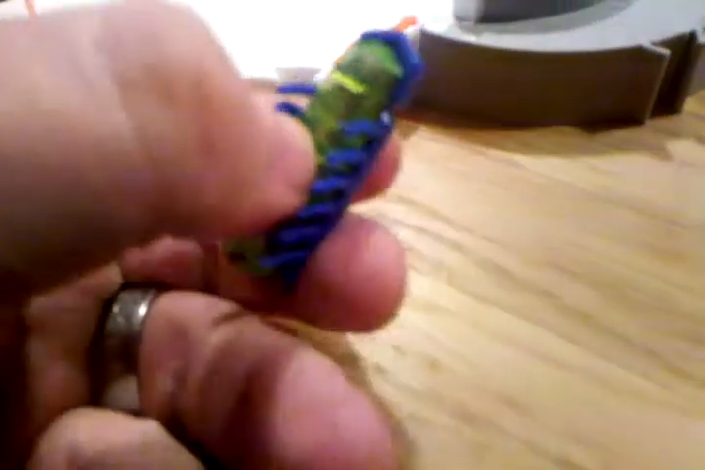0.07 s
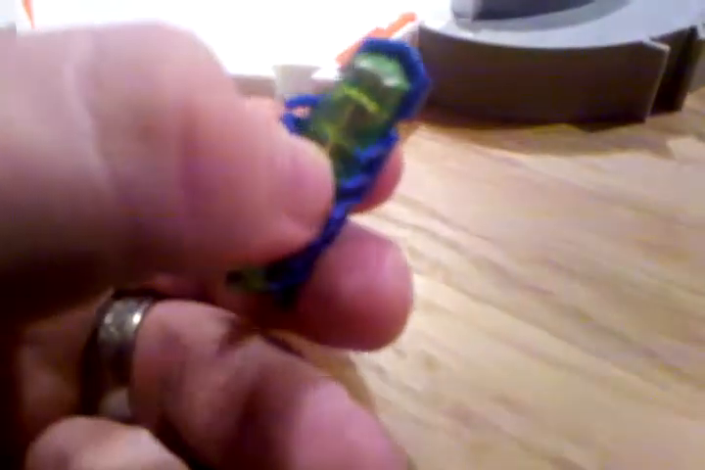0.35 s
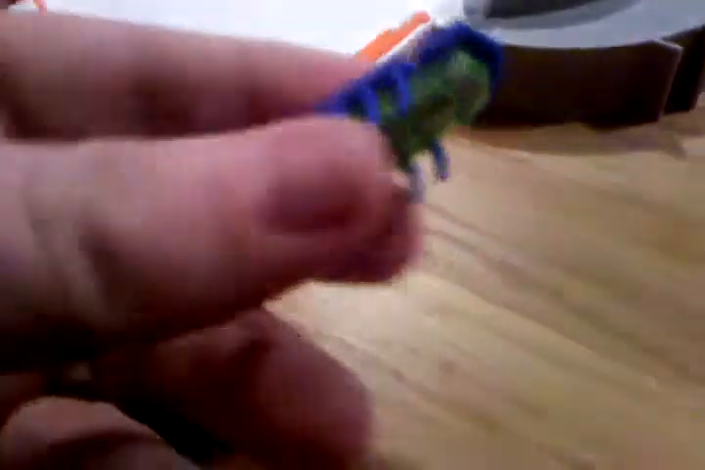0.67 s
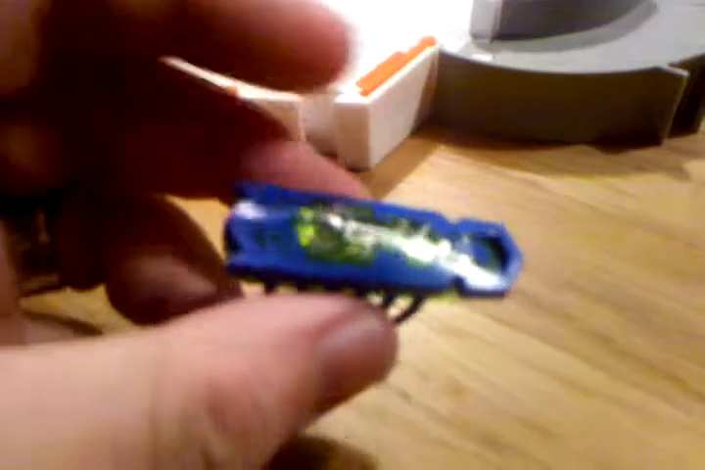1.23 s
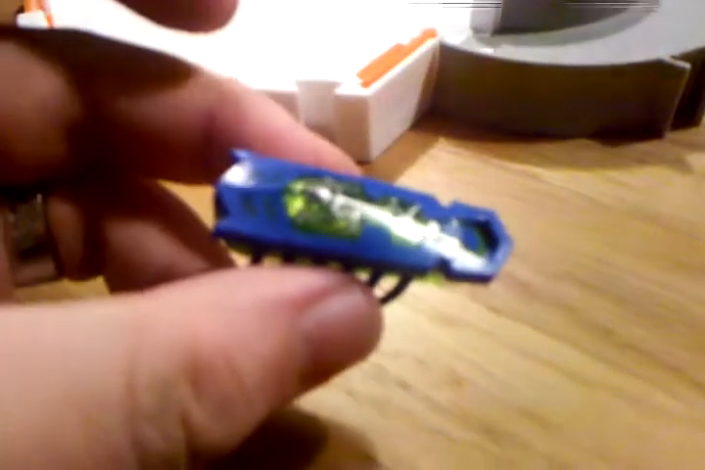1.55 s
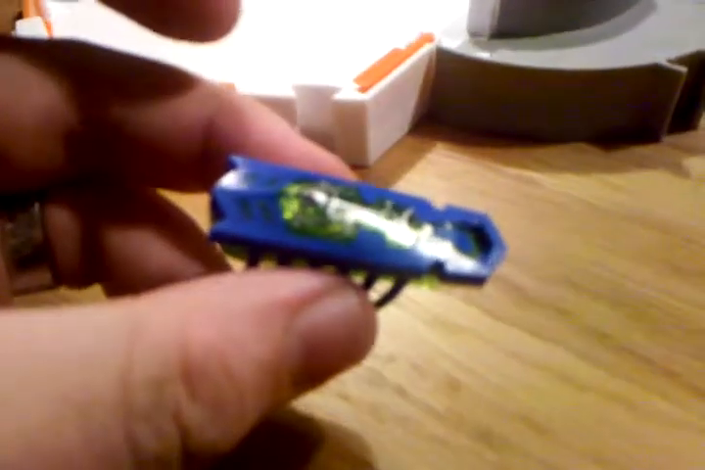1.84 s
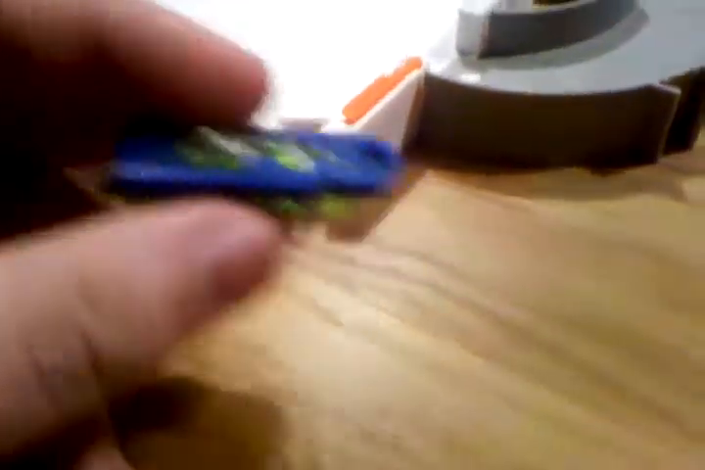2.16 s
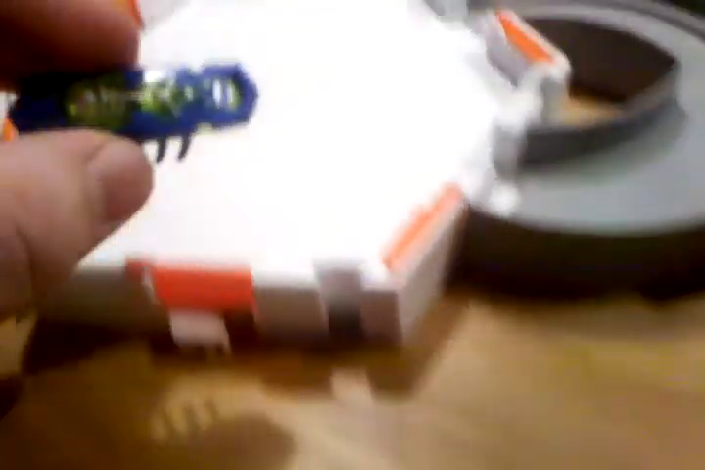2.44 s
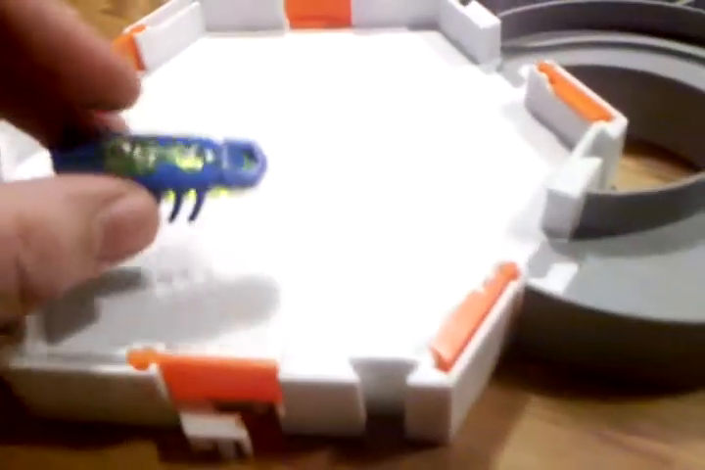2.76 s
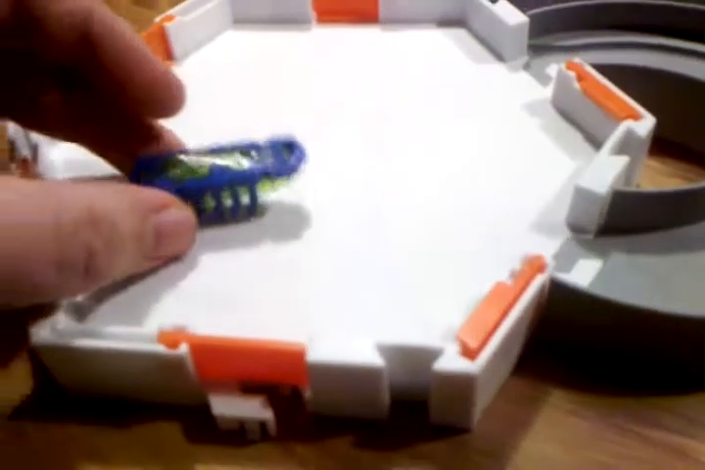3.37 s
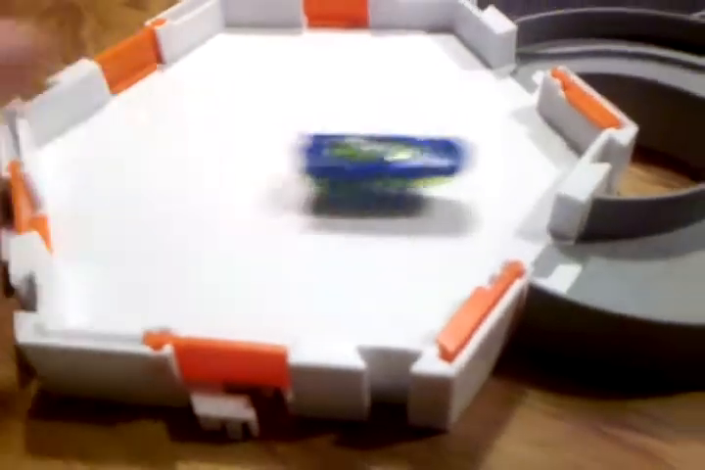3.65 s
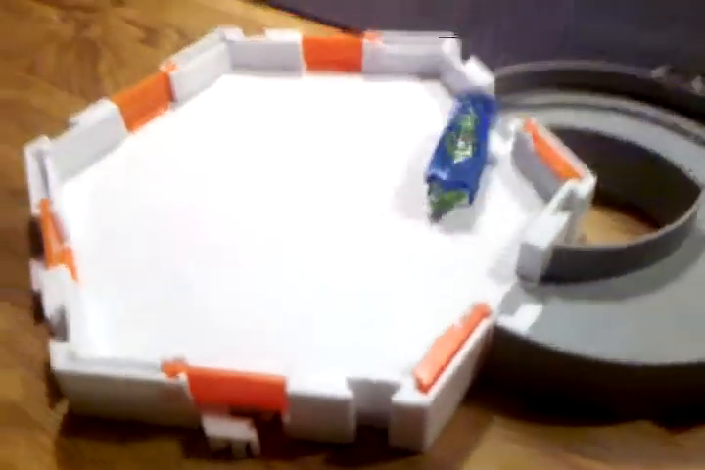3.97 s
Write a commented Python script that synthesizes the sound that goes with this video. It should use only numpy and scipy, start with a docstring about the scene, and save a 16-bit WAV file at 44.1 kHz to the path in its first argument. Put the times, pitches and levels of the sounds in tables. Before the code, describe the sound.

A small vibrating toy bug clicks on, ticks briefly and speeds up into a soft hum with a thin whine. It then buzzes against a plastic tray, rattles across it and knocks a wall, close by in a quiet room.

```python
"""A click, a ticking that speeds up into a hum, then a buzz and a rattle: a small plastic toy bug,
close by in a quiet room. Its motor spins an off-centre weight, which ticks on the shell once a turn
and then hums, while the motor's contacts add a thin whine. Held against a hard plastic tray, the
legs buzz; let go, the toy hops, drums the tray, rattles its own shell and knocks into a wall."""
import sys
import numpy as np
from scipy import signal
from scipy.fft import rfft, irfft
from scipy.io import wavfile
from scipy.ndimage import uniform_filter1d

SR = 44100
rng = np.random.default_rng(int(sys.argv[2]) if len(sys.argv) > 2 else 0)


def store_wav(level_fs):
    """Save 16-bit WAV to argv[1]."""
    pcm = np.round(np.clip(np.atleast_2d(level_fs), -1, 1) * 32767)
    wavfile.write(sys.argv[1], SR, pcm.T.astype(np.int16))


N = 176400
SWITCH_S, PRESS_S, RELEASE_S = .2813, 3.12, 3.385  # switched on, held on the tray, let go
SHELL_CUT_HZ = 1130  # the small shell gives off little sound below this

# tone colour of light rubbing: f/Hz, level/dB
RUBBING_COLOUR = [(1000, -13.5), (2600, -7), (3400, 2), (5200, 0), (7000, 3.5)]
# notes at which the tray rings: f/Hz, width/Hz, level/dB
TRAY_MODES = [(221, 32.5, 1), (306, 210, -8.5), (562, 76, -2), (624, 78, -4.5), (728, 100, -9),
              (939.4, 44.5, 1), (1082, 72, -2), (1240, 280, -6)]


def undb(db):
    """Turn decibels into a gain."""
    return 10 ** (np.asarray(db) / 20)


def unit(x):
    """Scale a signal to an average (rms) size of 1."""
    return x / np.sqrt(np.mean(x ** 2))


def curve(table, column=1):
    """Join one column of a table by straight lines in time."""
    rows = np.array(table, float)
    return np.interp(np.arange(N) / SR, rows[:, 0], rows[:, column])


def gate(start, end, fade):
    """Fade in from start and out from end; all in seconds."""
    t = np.arange(N) / SR
    return np.clip((t - start) / fade, 0, 1) * np.clip((end - t) / fade + 1, 0, 1)


def gain_at(points, hz):
    """Read the gain at hz from a table of f/Hz, level/dB."""
    rows = np.array(points, float)
    return undb(np.interp(np.log(hz + 1), np.log(rows[:, 0]), rows[:, 1]))


def colour(x, points):
    """Give a signal a tone colour and an average size of 1."""
    return unit(irfft(rfft(x) * gain_at(points, np.arange(N // 2 + 1) * SR / N), N))


def cut(x, hz, keep="high", order=3):
    """Keep the high or the low side of hz; a higher order cuts more steeply."""
    return signal.sosfilt(signal.butter(order, hz, keep, fs=SR, output="sos"), x)


def ring(x, modes):
    """Let x shake an object's natural notes (modes); narrow ones ring longer."""
    return sum(undb(db) * signal.lfilter(*signal.iirpeak(hz, hz / width, fs=SR), x)
               for hz, width, db in modes)


def drift(rate):
    """A smooth random wander of size 1, with about rate new values a second."""
    step = int(SR / rate)
    stairs = np.repeat(rng.standard_normal(N // step + 1), step)
    return unit(uniform_filter1d(uniform_filter1d(stairs, step), step)[:N])


def per_turn(turns):
    """One pulse at each whole turn, shared between two samples."""
    at = np.interp(np.arange(0, int(turns[-1])), turns, np.arange(N))
    i = at.astype(int)
    return np.bincount(i, 1 - at + i, N + 1)[:N] + np.bincount(i + 1, at - i, N + 1)[:N]


def harmonic(turns, k):
    """A pure tone that swings k times for each turn of the motor."""
    return np.sqrt(2) * np.sin(2 * np.pi * (k * turns + rng.random()))


def click(s, peak_db, modes, crunch=0, crunch_s=.0034):
    """One sharp contact, with an optional noisy crunch after it, sets the plastic ringing."""
    age = np.arange(N) - int(s * SR)
    tail = crunch * rng.standard_normal(N) * (age > 0) * np.exp(-np.abs(age) / SR / crunch_s)
    rung = ring((age == 0) + tail + 1e-18, modes)
    return undb(peak_db) * rung / np.abs(rung).max()


def room():
    """The quiet room: a faint, steady, mostly low noise."""
    # tone colour of the room: f/Hz, level/dB
    room_colour = [(30, -34.5), (60, -21.5), (110, -2), (250, -1.5), (600, -7.5), (2500, -16),
                   (7000, -11.5)]
    return undb(-66) * colour(rng.standard_normal(N), room_colour)


def finger_taps():
    """Fingers tap the shell softly; each tap rings one short note."""
    # taps: t/s, peak/dB, f/Hz, width/Hz
    taps = [(.019, -56.5, 790, 88), (.111, -57, 3420, 500), (.165, -55.5, 3750, 900)]
    return sum(click(s, db, [(hz, width, 0)], crunch=.17) for s, db, hz, width in taps)


def switch():
    """The switch snaps on with one bright click."""
    # notes of the switch: f/Hz, width/Hz, level/dB
    switch_modes = [(900, 900, -24.5), (3570, 2300, -18.5), (5850, 490, 1)]
    return click(SWITCH_S, peak_db=-24.5, modes=switch_modes)


def scraping(turns):
    """As the toy is carried over, something scrapes lightly, swelling once a turn."""
    # loudness of the scrape: t/s, level/dB
    levels = [(2.24, -73), (2.33, -58.5), (2.75, -62), (2.92, -67.5)]
    rubbing = colour(rng.standard_normal(N) * undb(2.5 * np.cos(2 * np.pi * turns)), RUBBING_COLOUR)
    return rubbing * undb(curve(levels)) * gate(levels[0][0], levels[-1][0], .02)


def ticking(turns):
    """While it is still slow, the weight taps the shell once a turn, a little unevenly."""
    # loudness of the ticks: t/s, level/dB
    levels = [(.32, -65.5), (.395, -54.5), (.5, -56), (.535, -62), (.568, -60)]
    # notes of a tick: f/Hz, width/Hz, level/dB
    tick_modes = [(3420, 420, 2), (4060, 1800, -5), (5430, 650, -7)]
    jitter_turns, low_edge_hz = .014, 2200
    taps = per_turn(turns + jitter_turns * drift(77)) * undb(1.2 * drift(79.1))
    ticks = unit(cut(cut(ring(taps, tick_modes), low_edge_hz), low_edge_hz))
    return ticks * undb(curve(levels)) * gate(levels[0][0], levels[-1][0], .002)


def whine(turns):
    """The motor's spinning contacts (the commutator) sing a few high tones."""
    # pitches of the tones: multiples of the turn rate
    multiples = [25, 33, 39, 45]
    # each tone in the first grip: level/dB
    first_db = [-96, -83.5, -82, -90]
    # each tone once the toy is turned over: level/dB
    turned_db = [-83.5, -81.5, -78, -77.5]
    # the whine comes and goes as the grip shifts: t/s, gain/dB
    grip = [(.58, 5), (.72, 5), (1.14, 1), (1.26, 0), (2.05, 2), (2.25, -2), (2.4, -17), (2.83, -15),
            (2.93, 0)]
    turned = gate(.75, N / SR, fade=.95)
    tones = 0
    for k, before, after in zip(multiples, first_db, turned_db):
        gain = undb(before + (after - before) * turned + 2 * drift(13))
        tone = harmonic(turns, k)
        neighbours = undb(-22.5) * (harmonic(turns, k - 1) + harmonic(turns, k + 1))
        tones += gain * (tone + neighbours)
    return tones * undb(curve(grip))


def motor(turns, hz):
    """The weight hums, louder with speed; the brushes buzz, hiss and ring the body under the whine."""
    # loudness as the hand turns the toy and moves it away: t/s, gain/dB
    nearness = [(1.3, -6), (1.6, -3), (2.1, -4.5), (2.7, -8)]
    # tone colour of the brush buzz: f/Hz, level/dB
    brush_colour = [(1200, -4), (2300, 0), (3200, 6), (3900, -1.5), (4200, 1.5), (4600, -15), (6800, 2.5)]
    strength = (hz / 150) ** 2.4 * undb(curve(nearness))
    hum = undb(-58) * strength * harmonic(turns, 1)
    buzz = unit(sum(gain_at(brush_colour, k * hz) * undb(2 * drift(3)) * harmonic(turns, k)
                    for k in range(2, 52)))
    rubbing = rng.standard_normal(N) * undb(12 * np.cos(2 * np.pi * turns))
    hiss = cut(colour(rubbing, RUBBING_COLOUR), SHELL_CUT_HZ)
    body = unit(ring(buzz + hiss, [(4180, 38, 0)]))  # one thin, high note
    whirr = strength ** .44 * (undb(-72.5) * buzz + whine(turns))  # swells less than the hum
    return (hum + whirr + undb(-81.5) * hiss + undb(-86.5) * body) * gate(SWITCH_S, N / SR, .01)


def pressed_legs(turns):
    """Held on the tray, the legs buzz in step with the motor, raggedly when the grip is loose."""
    # loudness of the buzz: t/s, bass/dB, middle/dB, treble/dB
    levels = [(3.125, -63, -52, -56), (3.138, -46.5, -53.5, -56.5), (3.155, -51.5, -66, -70),
              (3.21, -47.5, -72.5, -59), (3.3, -45.5, -60.5, -61), (3.325, -49.5, -46.5, -57),
              (3.39, -43.5, -45.5, -49)]
    # looseness of the grip: t/s, roughness from 0 to 1
    looseness = [(3.145, .65), (3.18, 0.17), (3.345, 0.04), (3.39, .7)]
    # bass tones at 2 to 7 times the turn rate, while the toy is held lightly: level/dB
    light_db = [-8.5, 3.5, -22, -12.5, 0.5, -9]
    # the same tones, fuller as the toy is pressed down firmly: level/dB
    firm_db = [-2.5, 6, 1, -6, -4.5, -2.5]
    # tone colour of the middle: f/Hz, level/dB
    middle_colour = [(900, -15.5), (1200, -0.5), (1480, -13.5), (1660, 1.5), (1850, -14.5), (2800, -36.5)]
    # tone colour of the treble: f/Hz, level/dB
    treble_colour = [(2300, -9), (3100, -4.5), (3450, 4), (3950, -4.5), (4700, -0.5), (5500, -14.5),
                     (6800, -10)]
    rough = curve(looseness)
    clean = np.sqrt(1 - rough ** 2)
    grit = unit(rng.standard_normal(N) * np.exp(-(turns % 1) / .5))  # a burst of noise each turn
    press = gate(3.3, N / SR, fade=.035)
    tones = unit(sum(undb(light + (firm - light) * press + drift(15)) * harmonic(turns, k)
                     for k, (light, firm) in enumerate(zip(light_db, firm_db), 2)))
    uneven = turns + .0068 * drift(130)  # the legs strike a little early or late
    strikes = sum(undb(2 * drift(20)) * harmonic(uneven, k) for k in range(8, 48))
    strikes *= undb(2 * drift(170) + 2.5 * np.cos(2 * np.pi * turns))
    bass = clean * tones + rough * unit(ring(grit, TRAY_MODES))
    middle = clean * colour(strikes, middle_colour) + rough * colour(grit, middle_colour)
    treble = clean * colour(strikes, treble_colour) + rough * colour(grit, treble_colour)
    buzz = sum(band * undb(curve(levels, i)) for i, band in enumerate([bass, middle, treble], 1))
    return buzz * gate(PRESS_S, N / SR, .0055) * gate(0, RELEASE_S, .02)


def thumps():
    """Each heavy landing is one soft push that sets the tray ringing."""
    # heavy landings: t/s, peak/dB, centre of the push f/Hz
    landings = [(3.461, -35, 537), (3.503, -30, 690), (3.864, -27, 940)]
    push_width_hz = 170
    sound = np.zeros(N)
    for s, db, hz in landings:
        push = ring((np.arange(N) == int(s * SR)) + 1e-18, [(hz, push_width_hz, 0)])
        rung = ring(push + 1e-18, TRAY_MODES)
        sound += undb(db) * rung / np.abs(rung).max()
    return sound


def knocks():
    """The hard shell itself hits the tray, then its wall."""
    # hits: t/s, peak/dB, share of crunch, crunch decay/s
    hits = [(3.57, -30, 0.63, 0.006), (3.806, -20, 0.088, 0.0038)]
    # notes of a knock: f/Hz, width/Hz, level/dB
    knock_modes = [(1710, 74, 2), (3731, 270, -9), (4450, 1100, 2.5), (5700, 270, 5), (6200, 320, -15)]
    return sum(click(s, db, knock_modes, crunch, decay) for s, db, crunch, decay in hits)


def flurry(s, attack_s, decay_s):
    """The strength of one landing: it rises until s, holds for 4 ms and dies away."""
    t = np.arange(N) / SR
    return np.exp(-np.maximum((s - t) / attack_s, (t - s - .004) / decay_s).clip(0))


def struck(contacts, power, modes):
    """Each contact lands on a new spot, so it pushes each ringing note its own way."""
    pushes = [contacts * np.sign(rng.standard_normal(N)) * undb(2 * drift(25.047)) for _ in modes]

    def rung(force):
        return sum(ring(force * push, [mode]) for push, mode in zip(pushes, modes))

    return rung(np.sqrt(power)) / np.std(rung(.92))  # a steady force sets the scale


def hopping(turns):
    """Each landing is many tiny contacts that drum the tray and rattle the shell."""
    # landings: t/s, strength/dB, relative treble/dB
    hops = [(3.401, -28, -15.5), (3.422, -25, -5), (3.467, -25, -5), (3.511, -23.5, -3),
            (3.538, -30.5, -11), (3.575, -27, -5), (3.616, -36, -1.5), (3.637, -35.5, -5.5),
            (3.665, -37.5, -4.5), (3.685, -26.5, -4), (3.723, -31.5, -6), (3.734, -34.5, -4.5),
            (3.768, -26.5, -10.5), (3.832, -35, -1.5), (3.867, -30.5, -4), (3.894, -32, -3.5),
            (3.909, -30, -8), (3.945, -36, 0), (3.98, -38.5, 5.5)]
    # legs brushing the tray between hops: t/s, level/dB
    skitter_levels = [(3.37, -40.5), (3.45, -55.5), (3.55, -53.5), (3.62, -45), (3.82, -50.5), (4, -51.5)]
    # notes at which the shell rings: f/Hz, width/Hz, level/dB
    shell_modes = [(1692, 230, 2), (3080, 94, -7.5), (3306, 180, 2.5), (3950, 220, -8.5), (4700, 490, -4.5),
                   (5330, 170, -7), (6230, 620, -10)]
    contacts_per_s, tray_lead_s = 2100, .0014  # the tray sounds just before the shell
    skitter = gate(RELEASE_S - .02, N / SR, .02) * undb(curve(skitter_levels))
    tray_power, shell_power = skitter ** 2, (skitter * undb(-8.5)) ** 2
    for s, db, treble in hops:
        tray_power += (undb(db - 13.5) * flurry(s - tray_lead_s, attack_s=.004, decay_s=.013)) ** 2
        shell_power += (undb(db + treble - 9) * flurry(s, attack_s=.0029, decay_s=.0065)) ** 2
    downswing = undb(np.cos(2 * np.pi * turns))  # contacts are harder as the weight swings down
    contacts = (rng.random(N) < contacts_per_s / SR) * downswing
    tray = cut(struck(contacts, tray_power, TRAY_MODES), hz=117)
    shell = cut(struck(contacts, shell_power, shell_modes), SHELL_CUT_HZ)
    return cut(tray, hz=2100, keep="low", order=4) + shell


def scene():
    """One motor sets the pace of the ticks, hum and buzz, over quiet room noise."""
    # turn rate as the motor starts: t/s, f/Hz
    starting = [(.3, 84.2), (.365, 89.6), (.405, 85.2), (.44, 86.2), (.54, 86.7), (.552, 111.9),
                (.59, 111.9)]
    # turn rate once it is running: t/s, f/Hz
    running = [(.66, 159.2), (.7, 167.3), (.81, 165.5), (.934, 153.7), (1.02, 154.2), (1.098, 138.5),
               (1.17, 133), (1.266, 146.9), (1.372, 144.7), (1.468, 150.9), (1.59, 152.3), (1.778, 148.9),
               (2.052, 150), (2.13, 145), (2.3, 147.9), (2.5, 145), (2.67, 137.6), (2.78, 146.5),
               (2.85, 157.2), (3.12, 159.2), (3.2, 152.8), (3.31, 150), (3.38, 152.7)]
    wobble, first_tick_s = .001923, .327
    hz = curve(list(starting) + list(running)) * (1 + wobble * drift(18))
    turns = np.cumsum(hz) / SR
    turns -= turns[int(first_tick_s * SR)]
    mix = switch() + knocks() + thumps() + finger_taps() + room()
    toy = motor(turns, hz) + ticking(turns) + scraping(turns) + pressed_legs(turns) + hopping(turns)
    return (mix + toy)[None]


def record(dry):
    """A small microphone with no deep bass, a slight lift in the treble and a steep top edge."""
    # tone colour of the microphone: f/Hz, gain/dB
    mic_colour = [(200, 0), (3600, 1), (6500, -3)]
    heard = irfft(rfft(dry, 2 * N) * gain_at(mic_colour, np.arange(N + 1) * SR / (2 * N)))[:, :N]
    thin = cut(heard, hz=60, order=2)
    return cut(thin, hz=7000, keep="low", order=24)


dry = scene()
out = record(dry)
store_wav(out)
```